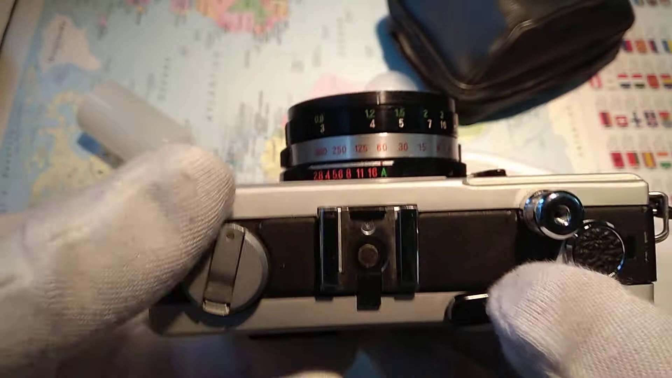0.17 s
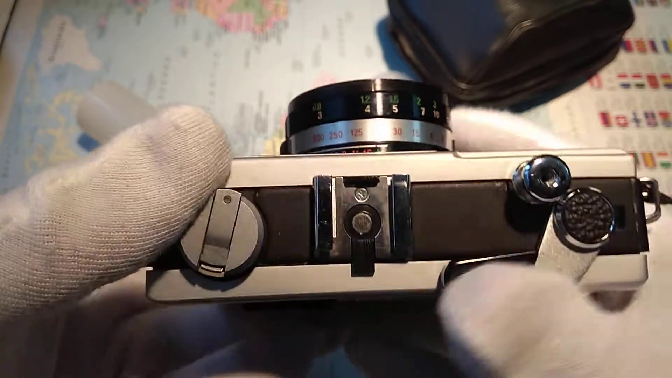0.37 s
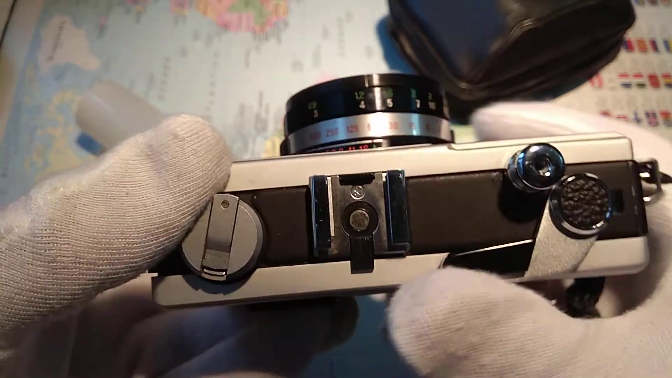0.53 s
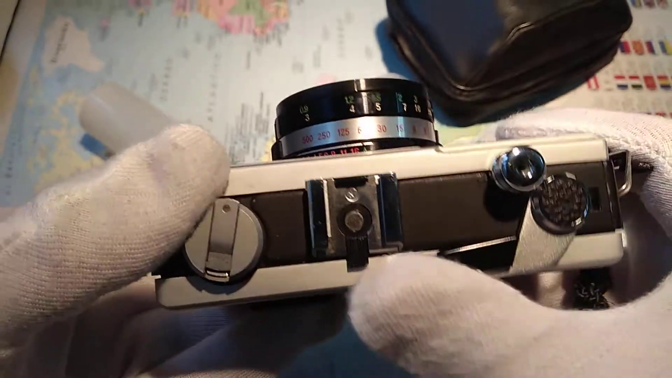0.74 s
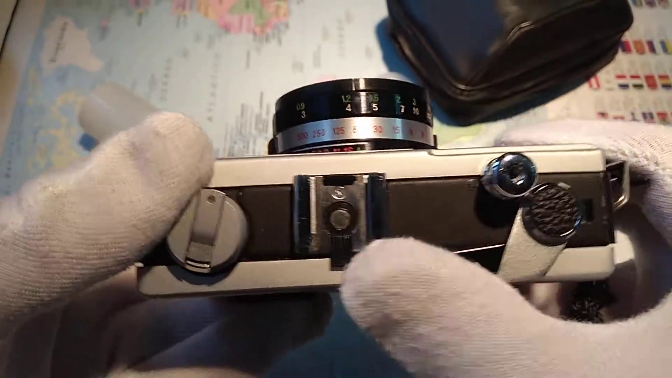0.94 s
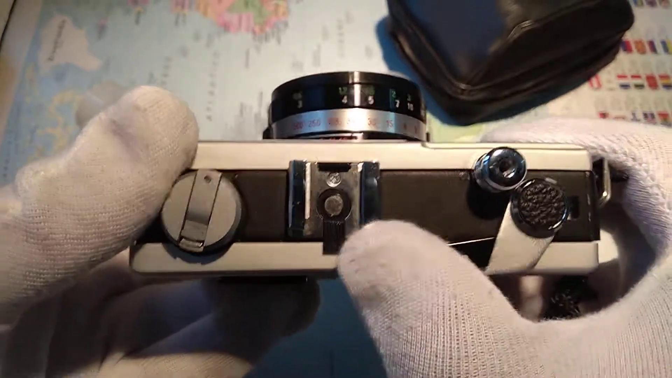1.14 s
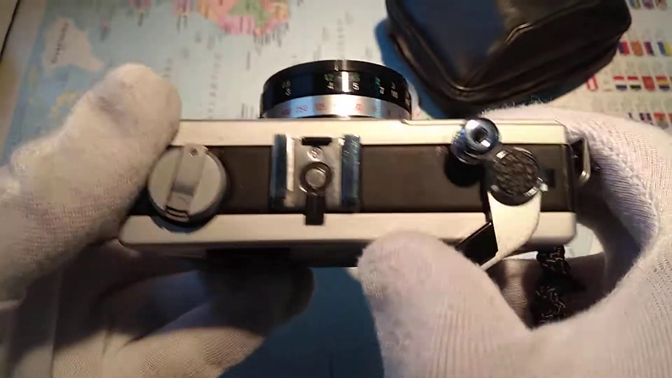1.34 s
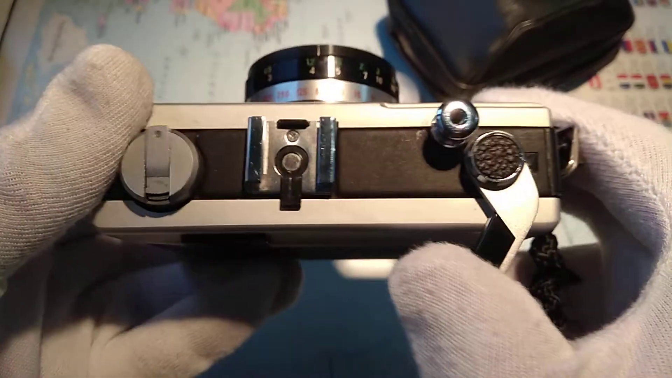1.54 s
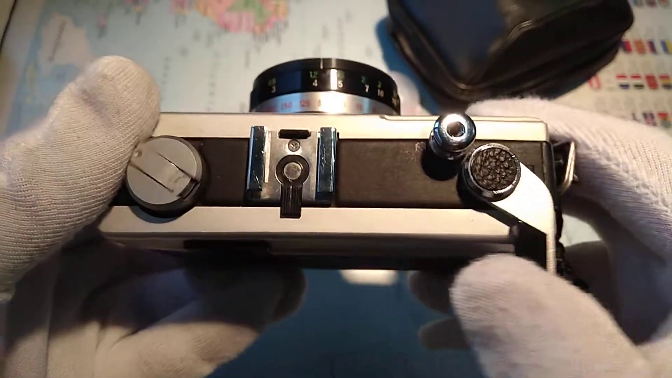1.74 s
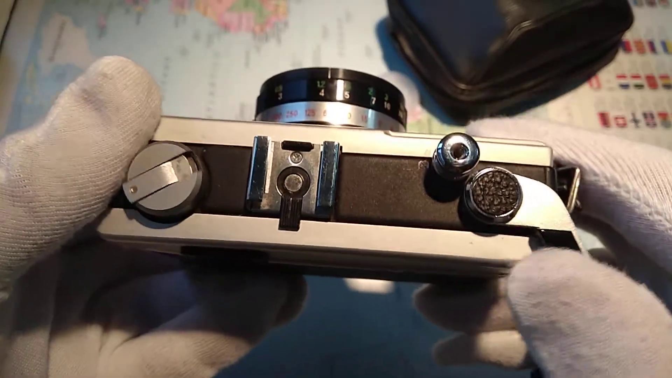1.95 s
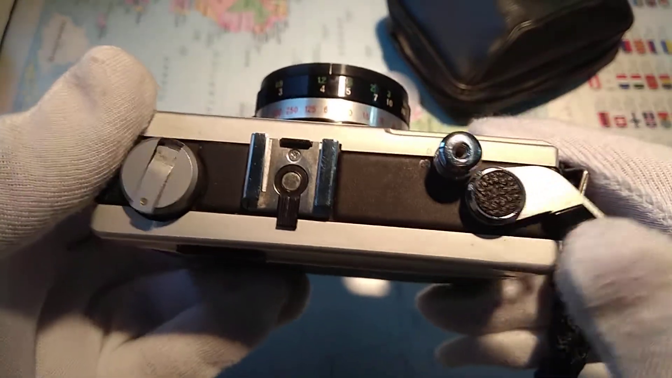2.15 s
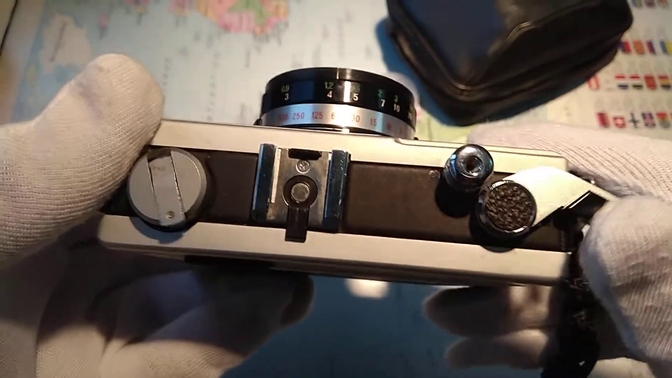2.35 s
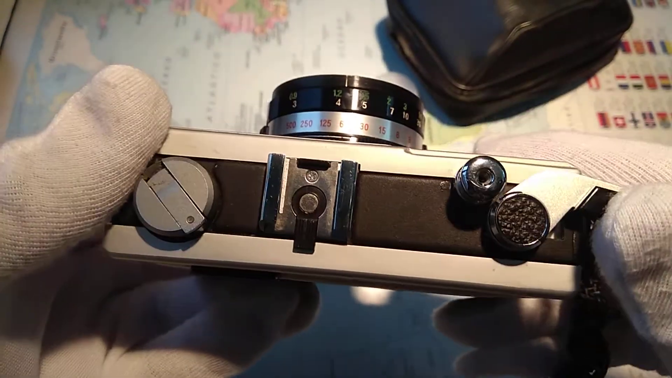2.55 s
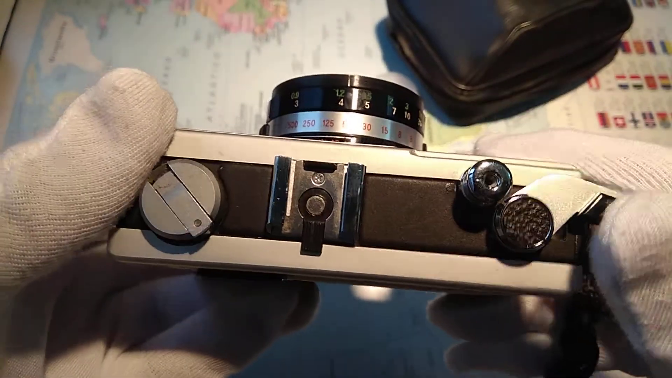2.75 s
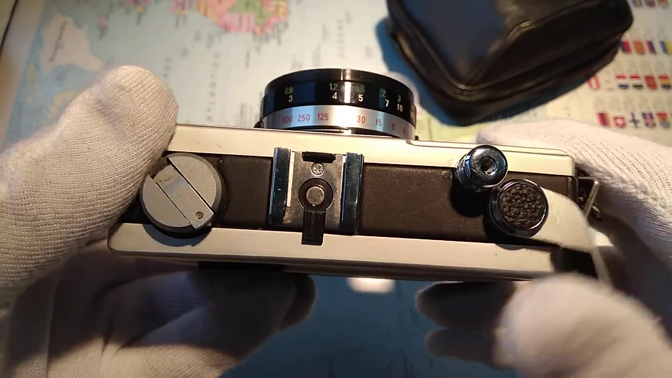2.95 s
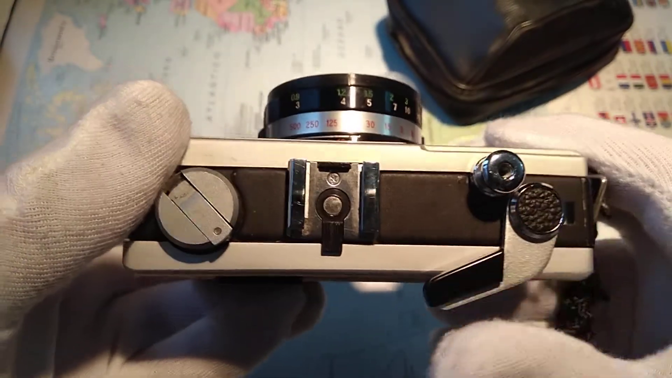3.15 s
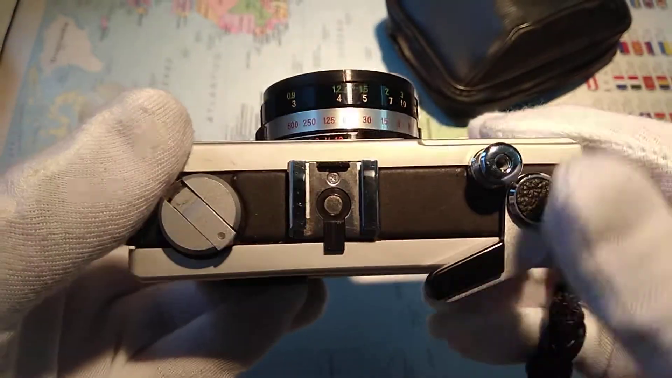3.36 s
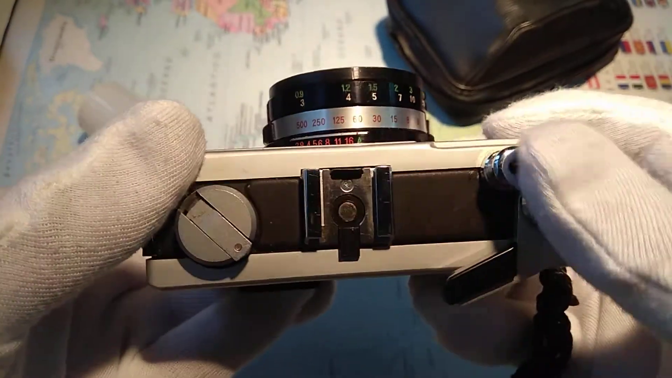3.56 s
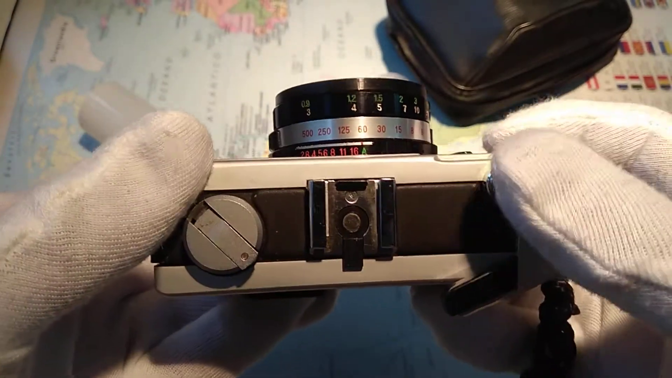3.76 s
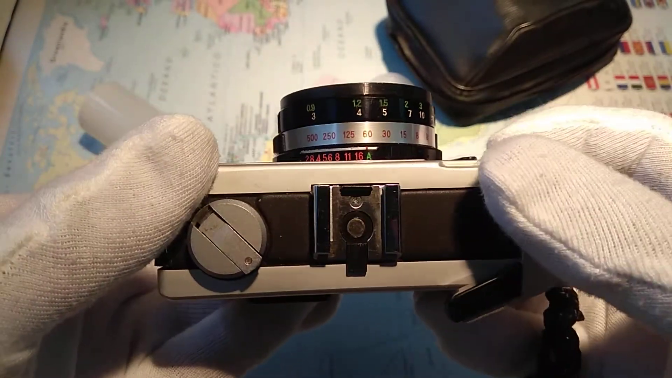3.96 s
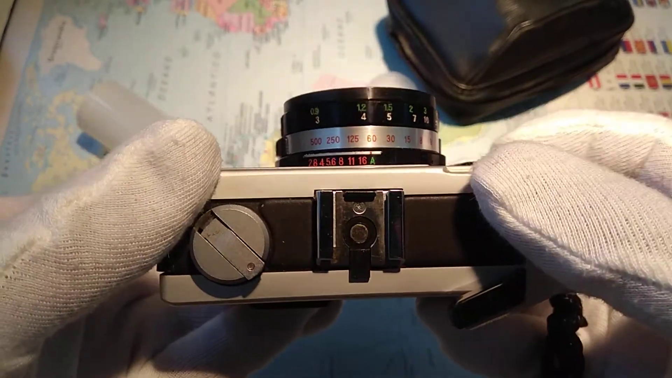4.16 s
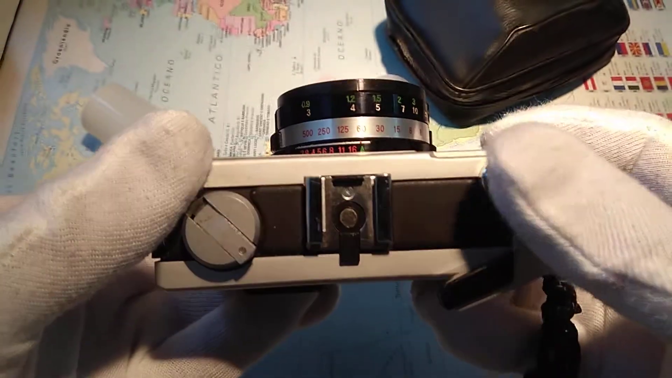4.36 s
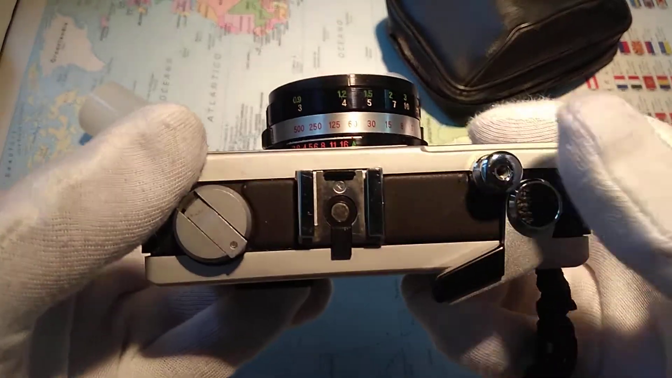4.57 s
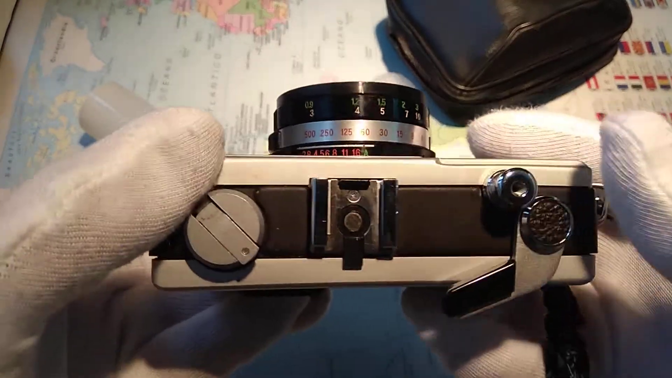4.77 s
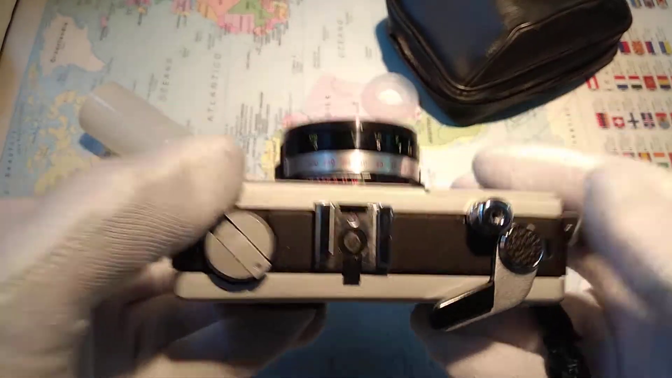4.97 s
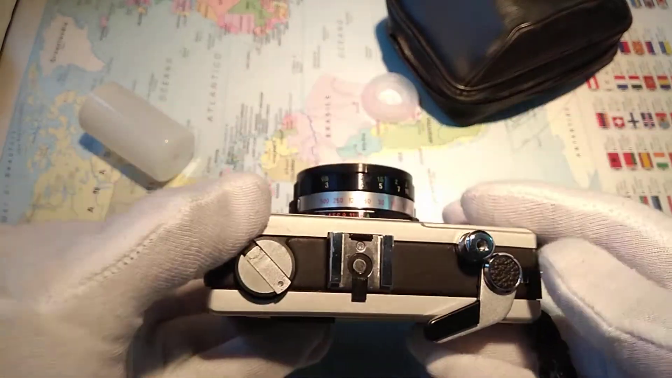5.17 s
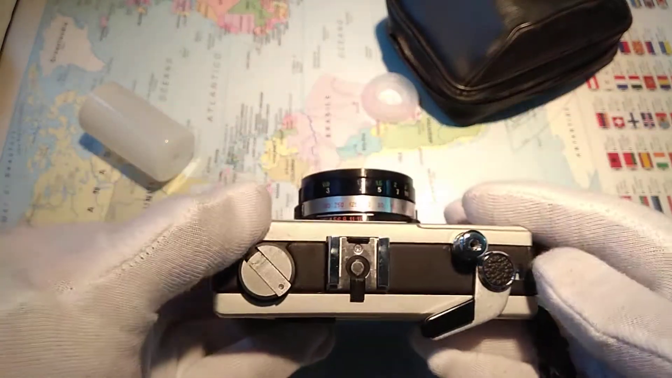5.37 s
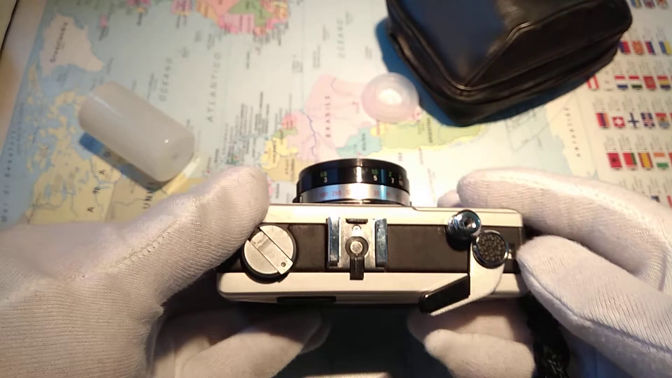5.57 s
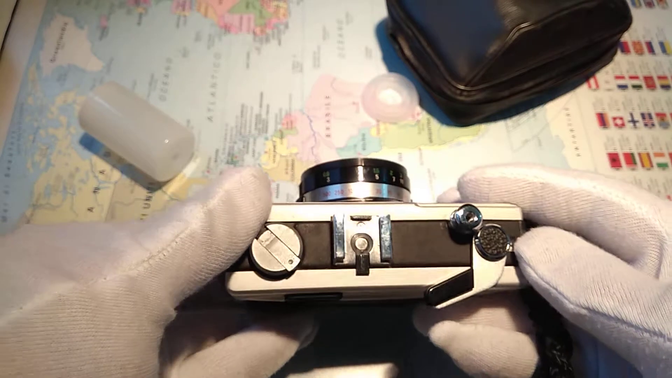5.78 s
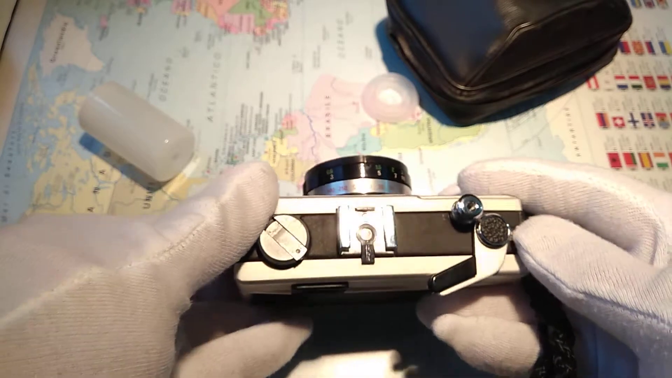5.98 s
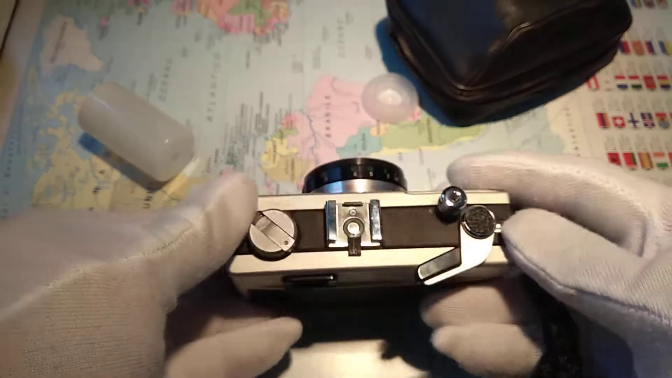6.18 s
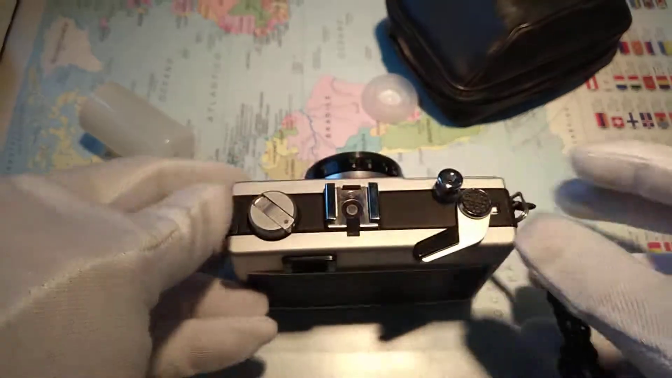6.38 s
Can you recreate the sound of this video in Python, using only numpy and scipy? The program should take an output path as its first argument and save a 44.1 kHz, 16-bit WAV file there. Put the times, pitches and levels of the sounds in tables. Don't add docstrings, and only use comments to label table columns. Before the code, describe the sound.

Gloved hands wind a small metal camera with a crisp ratchet, the lever snaps back, the shutter clacks, and it lands on a hollow table.

```python
import sys
import numpy as np
from scipy import signal
from scipy.fft import rfft, irfft, next_fast_len
from scipy.io import wavfile
from scipy.ndimage import uniform_filter1d, minimum_filter1d

SR = 44100
rng = np.random.default_rng(int(sys.argv[2]) if len(sys.argv) > 2 else 0)


def transcribe(u):
    v = np.clip(np.atleast_2d(u).T, -1, 1)
    q = np.round(v * 32767).astype(np.int16)
    wavfile.write(sys.argv[1], SR, q)


def invert_db(level):
    return 10 ** (np.asarray(level, dtype=float) / 20)


N = 282881
SET_DOWN_S = 6.1231

# pitch_hz [Hz], width_hz [Hz], level_db [dB]
BODY = [(740, 200, -4), (1064, 227, -6), (1397, 140, 6), (1930, 690, -7), (2390, 110, -9.5),
        (2920, 260, -6), (3720, 930, -1.5), (3980, 480, 1.5), (4614, 660, -4), (5360, 630, -3.5),
        (6730, 1000, -11), (8070, 240, -3), (8700, 490, -5.5), (9200, 210, 1.5), (9730, 770, 0),
        (10730, 300, 0), (11570, 890, 1), (12570, 630, -5), (13300, 430, -5), (14720, 720, -10.5)]


def unit(x):
    return x / np.sqrt(np.mean(x ** 2))


def colour(points, hz):
    pitch_hz, level_db = np.transpose(points)
    return invert_db(np.interp(np.log(hz + 1), np.log(pitch_hz), level_db))


def band(hz, lo_hz, hi_hz):
    return 1 / np.sqrt((1 + (lo_hz / (hz + 1)) ** 8) * (1 + (hz / hi_hz) ** 8))


def shaped(gain, count=N):
    noise = rng.standard_normal((2, 2 * len(gain) - 2))
    return unit(irfft(rfft(noise) * gain)[:, :count])


def walk(rate):
    hold = int(SR / rate)
    steps = np.repeat(rng.standard_normal(N // hold + 1), hold)
    return 1.28 * uniform_filter1d(uniform_filter1d(steps, hold), hold)[:N]


def curve(rows):
    start_s, *columns = np.transpose(rows)
    return [np.interp(np.arange(N) / SR, start_s, column) for column in columns]


def since(start_s):
    return np.maximum(np.arange(N) / SR - start_s, 0)


def fade(t, t60):
    return np.exp(-np.log(1000) * t / t60)


def panned(pan_db):
    return invert_db(np.array([[pan_db], [-pan_db]]) / 2)


def strokes():
    rubs = [(0.0, -66.5, .02, .15, -6), (0.178, -62.5, 0.17, 0.075, -6), (0.248, -61, 0.021, 0.14, -7),
            (0.416, -58, 0.15, 0.06, -14), (0.69, -55, 0.56, .03, -16.5), (0.72, -60, .03, 0.18, -2.5),
            (0.978, -59, 0.064, 0.066, -6.5), (1.18, -57, 0.036, 0.11, -4), (1.298, -59.5, 0.21, 0.19, -6),
            (2.56, -56.5, 1, 0.076, -6), (2.87, -62.5, 0.041, 0.26, -8.5), (3.33, -62.5, 0.57, 0.087, 5),
            (3.558, -57, 0.15, 0.11, -6), (3.814, -64, 0.25, 1, -2), (4.072, -60.5, .012, 0.068, -16),
            (4.27, -55, 0.12, 0.24, -2.5), (5.46, -73.5, 0.1, 0.06, 9), (4.53, -59.5, 0.014, 0.13, -5.5),
            (5.067, -55.5, 0.048, 0.085, -11), (5.156, -57, 0.1, 0.049, -5), (5.65, -63, 0.096, 0.25, -2),
            (5.74, -54.5, 0.036, 0.18, -2.5), (5.949, -60.5, 0.033, 0.31, -1.5),
            (6.3, -53, 0.043, 0.056, -5.5), (6.41, -57, 0.087, 0.11, -4.5)]
    t = np.arange(N) / SR
    power = invert_db(np.array([[-88], [-78]])) ** 2
    for start_s, level_db, rise_s, fall_s, mid_db in rubs:
        swell = np.sin(np.pi / 2 * np.clip(1 + (t - start_s) / max(rise_s, .005), 0, 1)) ** 2
        shape = swell * np.exp(-np.maximum(t - start_s, 0) / max(fall_s, .01))
        power = power + (shape * invert_db(level_db + np.array([[0], [mid_db]]))) ** 2
    return np.sqrt(power)


def gloves(hz):
    # pitch_hz [Hz], level_db [dB per Hz]
    cotton = [(3530, -34), (6000, -7.5), (7410, -7), (8240, -2), (15000, -5.5), (16100, -13),
              (16500, -41.5)]
    high, middle = strokes()
    treble = shaped(colour(cotton, hz) * band(hz, 7000, 17000)) * high
    treble = treble * invert_db(1.2 * walk(40) + 2.5)
    return treble + shaped(band(hz, 2800, 7600)) * middle * invert_db(0.73 * walk(27) + 2.5)


def traffic(hz):
    passing = [(0, -63.5, -5, -2.2), (.38, -69.5, -11, 5), (.5, -72, 30, 0.8), (.68, -67, 9, -0.9),
               (1.0, -66, -16, 2.2), (1.3, -62, -3.5, -1.5), (1.7, -63, 2, 2), (2.3, -63.5, 2.5, -0.5),
               (2.6, -62, -2.5, 0), (2.75, -61.5, 4, -5), (2.92, -64, 6, -1), (3.45, -63, 1.5, -2),
               (3.6, -60.5, -7, 0), (4.35, -61.5, -1, -1), (4.93, -63, -10, 0.8), (5.55, -59, -1, -1.6),
               (5.83, -58, 0, 2.5), (6.05, -59, -4.5, 3.5)]
    # pitch_hz [Hz], level_db [dB per Hz]
    street = [(15, -56), (25, -26.5), (75, -27.5), (149, -3), (196, 0), (243, -12), (287, -1.5), (478, -13),
              (780, -6), (867, -11.5), (1100, -7), (1710, -12), (2850, -19.5), (3670, -21.5), (4000, -11),
              (5200, -53), (8800, -120)]
    lag_s = .36 / 1000
    level_db, hum_db, roar_db = curve(passing)
    low_db = -64.0 + 1.65 * (level_db + 62.5)
    high_db = -63.0 + 0.94 * (level_db + 63) + roar_db
    layers = [(low_db + hum_db / 2, 110, 220, .3),
              (low_db - hum_db / 2, 220, 550, .3),
              (high_db, 550, 3000, 4.5)]
    alike = 1 / (1 + (hz / 1490) ** 1.56)
    late = np.exp(-2j * np.pi * hz * lag_s)
    out = 0
    for layer_db, lo_hz, hi_hz, lift_db in layers:
        noise = rfft(rng.standard_normal((2, 2 * len(hz) - 2)))
        right, other = noise * colour(street, hz) * band(hz, lo_hz, hi_hz)
        left = (alike * right + np.sqrt(1 - alike ** 2) * other) * late
        layer = unit(irfft(np.array([left, right]))[:, :N])
        out = out + layer * invert_db(layer_db + 2.1 * walk(9) + lift_db)
    deep = shaped(band(hz, 46, 80) / (hz + 30))[0] * invert_db(-87.5 + 3.3 * walk(4))
    return (out + deep) * panned(-0.5)


def impacts(events, top_hz=25000, strike=0, bounce_db=5, body=BODY):
    size = 2048
    out = np.zeros((2, N + size))
    hz, ms = np.fft.rfftfreq(size, 1 / SR), np.arange(size) * 1000 / SR
    pitch_hz, width_hz, level_db = np.transpose(body)[:, :, None]
    region = np.digitize(pitch_hz[:, 0], [2500, 6000])
    late = np.exp(-2j * np.pi * hz * np.array([[.00014], [0]]))
    crack = invert_db(-11) * band(hz, 5570, 19000) * late
    small = band(hz, 440, top_hz)
    for start_s, peak_db, mid_db, low_db, length_ms, pan_db in events:
        uneven = unit(uniform_filter1d(rng.standard_normal(size), size=20))
        bounces = invert_db(bounce_db * np.minimum(ms / 1.3, 1) * uneven)
        envelope = (1 - np.exp(-ms / 0.4)) * np.exp(-ms / max(length_ms, .3))
        force = envelope * (bounces + strike * np.exp(-ms / 0.38)) * rng.standard_normal(size)
        push = rfft(force)
        push /= uniform_filter1d(np.abs(push), size=30)
        chance = rng.standard_normal((2, 2, len(body), 1))
        gain = invert_db(level_db + 3.5 * chance[0]) * np.exp(1j * np.minimum(pitch_hz / 2500, 2) * chance[1])
        modes = gain * 1j * hz * width_hz / (pitch_hz ** 2 - hz ** 2 + 1j * hz * width_hz)
        at = int(start_s * SR)
        for k, share_db in enumerate((low_db + 2.5, mid_db + 6, 0)):
            answer = modes[:, region == k].sum(axis=1)
            if k == 2:
                answer = answer + crack
            ring = irfft(push * small * answer)
            ring[:, -400:] = 0
            ring /= np.abs(ring).max(axis=1, keepdims=True)
            out[:, at:at + size] += ring * invert_db(peak_db + share_db + 2.0) * panned(pan_db)
    return out[:, :N]


def touches(rows):
    return [(*row[:-1], 2.5, row[-1]) for row in rows]


def hand_taps():
    taps = [(0.7033, -29, -21, -18.5, 8.5), (0.7677, -40, -15, -25, -4), (1.1725, -39, -10.5, -9, -3),
            (1.3126, -33, -23, -32, -4), (1.3964, -47.5, -10.5, -4, -6), (3.4437, -47, -25, -23, 10),
            (3.469, -42, -13, -28, 0), (3.5483, -41, -22, -22, -9), (3.607, -41, -13, -27, -2),
            (3.6169, -22.5, -16, -46, -1.5), (3.6696, -38, -6, -17, -4), (3.967, -46, -6.5, -8, 1),
            (4.0071, -43, -12.5, -18, -3), (4.3292, -36, -8.5, -17, 0), (4.3866, -31, -11.5, -12, -8),
            (4.3902, -26, -14.5, -14.5, 2), (4.3964, -24.5, -16, -19, -1), (4.8304, -56, 4.5, -8, -5),
            (5.0449, -45, -16, -6.5, 2.5), (5.7144, -42, -6, -24, 3.5), (5.7228, -43, -8, -22, -2),
            (5.7544, -32, -16, -25, 2.5), (5.7636, -30, -31, -31, 8)]
    return impacts(touches(taps), strike=0.94)


def room(x):
    ranges = [(150, 0.31, -23), (491, 0.59, -15), (1480, 0.35, -19.5), (3880, 0.33, -15.5),
              (8910, 0.47, -22.5), (14000, .25, -19)]
    size, tail = 16384, 0
    hz, t = np.fft.rfftfreq(size, 1 / SR), np.arange(size) / SR
    log_centres = np.log([row[0] for row in ranges])
    for k, (_, t60, level_db) in enumerate(ranges):
        share = np.interp(np.log(hz + 1), log_centres, np.arange(len(ranges)) == k)
        noise = irfft(rfft(rng.standard_normal((2, size))) * np.sqrt(share))
        even = np.sqrt(2 * np.log(1000) / (t60 * SR))
        tail = tail + invert_db(level_db) * noise * fade(t, t60) * even
    tail *= 1 - np.exp(-t / 0.0011)
    return signal.fftconvolve(x, tail, axes=1)[:, :N]


def teeth(rows, tooth_ms=2.2):
    start_s, peak_db, mid_db, pan_db = np.transpose(rows)
    thud_db = -54 + 0.29 * (peak_db + mid_db + 44.5)
    length_ms = tooth_ms * np.exp(0.16 * rng.standard_normal(len(start_s)))
    return np.transpose([start_s, peak_db + 0.5, mid_db, thud_db - peak_db, length_ms, pan_db])


def ratchet():
    # start_s [s], treble peak_db [dB], middle re treble [dB], left minus right [dB]
    pawl = [(1.5327, -22, -21.5, -1.5), (1.5767, -15.5, -21, -4.5), (1.6226, -15.5, -25.5, 0),
            (1.6747, -17.5, -27, -5), (1.718, -19.5, -27, -6), (1.7659, -20, -21, -1),
            (1.8133, -18, -21, -1), (1.8489, -17.5, -20, -4), (1.8944, -20.5, -23, 1),
            (1.9263, -18.5, -31, -1), (1.961, -21.5, -25, -1), (1.9865, -18.5, -22.5, -4),
            (2.0328, -18.5, -20, 1), (2.0732, -21.5, -23, -2), (2.1021, -18, -23, -0.5),
            (2.1334, -17, -23.5, 0.5), (2.166, -19.5, -20.5, 1), (2.2115, -19.5, -21, -1),
            (2.2353, -16, -24.5, -2), (2.2684, -19, -32, -2), (2.3345, -20.5, -27, -0.5),
            (2.3592, -18.5, -28, -4), (2.39, -21, -24, 0), (2.4166, -16.5, -24, -1),
            (2.4433, -22.5, -32, -5), (2.466, -19.5, -20, -5), (2.4899, -18, -32, -3),
            (2.5171, -16, -26, -2.5)]
    gears = [(1.483, -46, -1, -1), (1.508, -38, -6.5, -6.5), (1.6015, -19, -26.5, -2.5),
             (1.64, -27, -19, 3), (1.6517, -21, -21, -5), (1.699, -24.5, -21, 5), (1.7393, -23, -22.5, 4),
             (1.7536, -26, -18, -5), (1.787, -29, -29, -5), (1.7942, -23, -22, -2),
             (1.8263, -17.5, -38, -3), (1.831, -27, -24, -4), (1.866, -24.5, -15.5, -5),
             (1.8808, -20, -24, -5), (1.8983, -24.5, -15.5, 2), (1.935, -33, -22, -2),
             (2.0065, -16.5, -24, 1), (2.1733, -26, -26, -5), (2.184, -27, -18, -4), (2.1925, -23, -20, -4),
             (2.836, -49, -24, -4), (2.858, -38, -22, -1.5), (2.872, -33, -27.5, 2.5),
             (2.901, -31.5, -26.5, -2.5), (2.9825, -40.5, -10, -3.5), (2.991, -35.5, -21.5, 0.5),
             (1.683, -33, -14.5, -1), (1.998, -38, -19, -1), (2.016, -39, -22, -6), (2.2747, -33, -31, -6),
             (2.279, -39, -24, -1), (2.5005, -46, -24, 3)]
    back = [
        (3.015, -16.5, -32, -4.5),
        (3.05, -13, -34.5, -1),
        (3.0892, -12.5, -30, 0.5),
    ]
    pawl_ring = (9290, 420, 10)  # Hz, width Hz, dB
    winding = impacts(teeth(pawl + gears), strike=2.1, bounce_db=3)
    skipping = impacts(teeth(back, 1.9), strike=2.2, bounce_db=3, body=BODY + [pawl_ring])
    return winding + skipping


def knocks():
    panels = [(1.5065, -41.5, 1950, 550, -6), (2.186, -38, 2430, 277.8, -8), (6.353, -35.5, 1750, 250, -1),
              (6.3535, -36, 670, 91, 0), (6.353, -38, 1350, 330, 0), (6.353, -46, 2450, 340, 0),
              (6.1236, -19, 1440, 320, 0), (3.1245, -34, 2400, 280, -7), (3.1398, -6.5, 9270, 170, 1),
              (3.1400, -27, 640, 150, -0.5), (3.607, -35, 7800, 500, -6), (3.1329, -19, 10700, 400, 0),
              (3.133, -21, 13600, 500, 0), (3.1331, -22, 8300, 400, 0), (3.0151, -25, 14200, 500, -2),
              (3.0502, -23, 14000, 500, 0), (3.0893, -24, 14200, 500, 0), (3.618, -41.5, 4040, 120, 0),
              (3.123, -43, 1150, 300, 0), (4.137, -29, 2000, 89.7, -2), (6.1234, -23.5, 4000, 250, -1),
              (6.1405, -26, 4050, 280, 1)]
    out = 0
    for start_s, peak_db, pitch_hz, width_hz, pan_db in panels:
        t = since(start_s)
        envelope = (1 - np.exp(-t / .0005)) ** 2 * np.exp(-np.pi * width_hz * t)
        ring = envelope * np.sin(2 * np.pi * pitch_hz * t)
        out = out + ring / ring.max() * invert_db(peak_db) * panned(pan_db)
    return signal.sosfilt(signal.butter(8, 530, "high", fs=SR, output="sos"), out)


def lever_return():
    clacks = [
        (3.1209, -13.5, -29, -35, 1.9),
        (3.1240, -20.5, -15.5, -20, 2.2),
        (3.1327, -11, -26, -37, 2.5),
        (3.1368, -8, -20.5, -32, 0.83),
        (3.1390, -4, -20, -19, 2.8),
        (3.1412, -2.5, -19, -21, 2),
        (3.1445, -11.5, -16.5, -19, 2.8),
        (3.1497, -16.5, -14, -14, 3.5),
    ]
    stop_ring = (9290, 300, 6)  # Hz, width Hz, dB
    events = [(*row, 0.5) for row in clacks]
    return impacts(events, strike=.8, bounce_db=2.0, body=BODY + [stop_ring])


def plates(x):
    thin_parts = [(3620, -16, .2), (4050, -14, .33), (4463, -15, .3), (5216, -14, .28), (6126, -8, .24),
                  (7418, -10, .21), (8150, -14, .3), (8800, -18, .3), (9290, -28, .3), (10320, -14, .16),
                  (11620, -15, .25)]
    t, tail = np.arange(16384) / SR, 0
    for pitch_hz, level_db, t60 in thin_parts:
        near_hz = pitch_hz * (1 + .025 * rng.standard_normal((10, 1, 1)))
        phase = rng.random((10, 2, 1))
        rings = np.sin(2 * np.pi * (near_hz * t + phase)).sum(axis=0)
        tail = tail + invert_db(level_db) * rings * fade(t, t60)
    tail = tail * (1 - np.exp(-t / 0.0015))
    return invert_db(-44) * signal.fftconvolve(x, tail, axes=1)[:, :N]


def springs():
    # start_s [s], pitch_hz [Hz], level_db [dB], t60 [s]
    hums = [
        (4.156, 928, -53.5, 1.5),
        (4.15, 800, -55, .25),
        (4.15, 1395, -46, .25),
        (3.143, 1400, -36, .1),
        (4.16, 2790, -58, .8),
    ]
    recoil = [
        (4.135, 337, -43, 0.057),
        (4.1555, 262, -44, .06),
        (4.136, 89, -53.5, .1),
    ]
    out = 0
    for start_s, pitch_hz, level_db, t60 in hums + recoil:
        t = since(start_s)
        out = out + invert_db(level_db) * fade(t, t60) * np.sin(2 * np.pi * pitch_hz * t)
    return out


def padded_taps():
    taps = [
        (4.0746, -41, -22, -23, -7),
        (4.5015, -26, -11.5, -33, -8),
        (5.667, -37.5, -6, -28, 0),
    ]
    return impacts(touches(taps), top_hz=9700, strike=1.7)


def shutter():
    clacks = [
        (4.1343, -10.5, -18, -25, 1.7),
        (4.1364, -5.5, -17, -23, 0.82),
        (4.1376, -6, -19.5, -22.5, 1.6),
        (4.1394, -7, -21, -23, 3.3),
        (4.1432, -16, -25, -17.5, 4),
        (4.1468, -14.5, -23, -20, 3.6),
        (4.1508, -15.5, -21.5, -14, 3.5),
        (4.1551, -5, -24, -24.5, 1.5),
        (4.1577, -11.5, -25, -24, 1.5),
        (4.161, -20.5, -20, -25.5, 9.1),
    ]
    return impacts([(*row, 0) for row in clacks], strike=1.0, bounce_db=2.5)


def drag(hz):
    singing = [(4000, 300, -4), (4960, 350, -1.5), (5800, 300, -6), (6800, 300, -6), (8530, 350, -0.5),
               (10000, 900, -6), (11300, 500, -1), (13900, 600, -5), (15100, 400, -6)]
    t = np.arange(N) / SR - 5.764
    power = sum(invert_db(level_db) ** 2 / (1 + (2 * (hz - pitch_hz) / width_hz) ** 2)
                for pitch_hz, width_hz, level_db in singing)
    hold_s, fall_s = 0.078, 0.051
    shape = np.clip(t / .003, 0, 1) * np.exp(-np.maximum(t - hold_s, 0) / fall_s)
    return shaped(np.sqrt(power) * band(hz, 3300, 16000)) * shape * invert_db(-44.5 + 2.5 * walk(400))


def set_down():
    clacks = [
        (6.1235, -5, -19, -13.5, 1.6),
        (6.1274, -12.5, -23, -14.5, 1.6),
        (6.1315, -20, -12, -14, 5.5),
        (6.1404, -12, -21, -20, 2.1),
        (6.1445, -20, -19, -14.5, 6),
        (6.2587, -35, -28, -13, 3.2),
        (6.3094, -43, -8, -5.5, 3.0),
        (6.3524, -59, -27, 18, 1.5),
    ]
    duller = BODY[:2] + BODY[3:]
    return impacts([(*row, 0.3) for row in clacks], strike=0.94, bounce_db=3.5, body=duller)


def table():
    top_modes = [(159, 2, 0.195), (196, -5, 0.17), (256, -4, 0.08), (231.8, -1, 0.23), (288, -10, 0.38),
                 (320, -7.5, 0.14), (395, -6.5, 0.098), (457, -8, 0.097), (553, -29, 0.12),
                 (708, -3, 0.068), (765, -10, 0.03), (1050, -4, 0.021), (1260, -6, 0.021),
                 (1590, -7, 0.036)]
    t = since(SET_DOWN_S)
    ring = sum(-invert_db(level_db) * fade(t, t60) * np.sin(2 * np.pi * pitch_hz * t)
               for pitch_hz, level_db, t60 in top_modes)
    push_ms = 0.67
    dent = -invert_db(10.0) * np.sin(np.pi * np.minimum(t * 1000 / push_ms, 2)) * np.exp(-t * 1000 / 0.5)
    knock = signal.sosfilt(signal.cheby1(4, 1, 125, "high", fs=SR, output="sos"), ring + dent)
    sway = invert_db(-39) * fade(t, 0.3) * np.sin(2 * np.pi * 49.6 * t)
    return (invert_db(-16.5) * knock + sway) * panned(-2.2)


def shiver(hz):
    t = since(SET_DOWN_S)
    a, b = shaped(band(hz, 280, 800))
    shape = (1 - np.exp(-t / .03)) * fade(t, 0.47)
    return invert_db(-31) * shape * np.array([a + 0.25 * b, a - .3 * b])


def masked(x):
    hz, _, cells = signal.stft(x, SR, nperseg=256)
    power = np.mean(np.abs(cells) ** 2, axis=0)
    power = uniform_filter1d(uniform_filter1d(power, size=6, axis=0), size=2, axis=1)
    cell_db = 10 * np.log10(power[::6, ::2] + 1e-18)
    tick_db = -minimum_filter1d(-cell_db[4:].max(axis=0), size=7, origin=2)
    limit_db = np.minimum(tick_db, -43) - 31 + 3.5 * rng.standard_normal(cell_db.shape)
    keep = 1 / (1 + invert_db(4 * np.clip(limit_db - cell_db, -10, 10)))
    keep = np.repeat(np.repeat(keep, 6, axis=0), 2, axis=1)[:len(hz), :power.shape[1]]
    keep[hz < 2500] = 1
    return signal.istft(cells * keep, SR)[1][:, :N]


def scene():
    hz = np.fft.rfftfreq(2 * next_fast_len(N // 2 + 64), 1 / SR)
    lever, release = lever_return(), shutter()
    sources = [(ratchet(), 5.5), (lever, 10), (release, 11.5), (hand_taps(), 6.5),
               (set_down(), 9.5), (table(), 8.5), (padded_taps(), -3)]
    near = sum(sound for sound, _ in sources)
    far = room(sum(invert_db(wet_db) * sound for sound, wet_db in sources))
    ringing = plates(lever + invert_db(-10) * release)
    camera = near + far + ringing + knocks() + springs() + drag(hz)
    return camera + shiver(hz) + gloves(hz) + traffic(hz)


def low_pass(x):
    return signal.sosfilt(signal.butter(12, 16970, fs=SR, output="sos"), x)


def record(dry):
    rounded = np.tanh(dry / 1.1) * 1.1
    cut = signal.sosfilt(signal.cheby2(8, 40, 16600, fs=SR, output="sos"), rounded)
    return low_pass(masked(cut))


dry = scene()
out = record(dry)
transcribe(out)
```